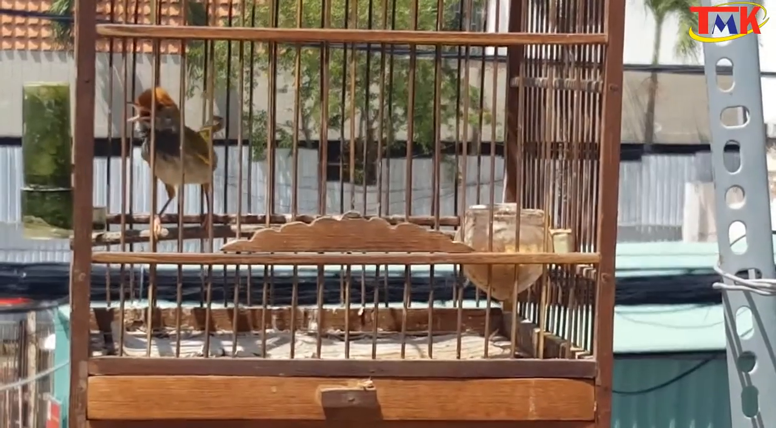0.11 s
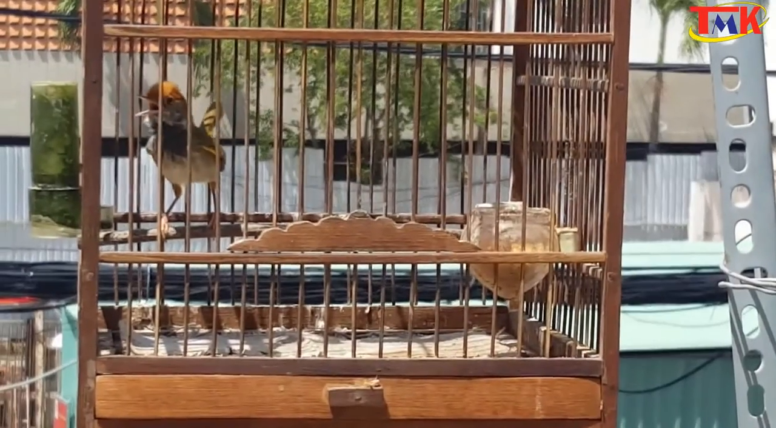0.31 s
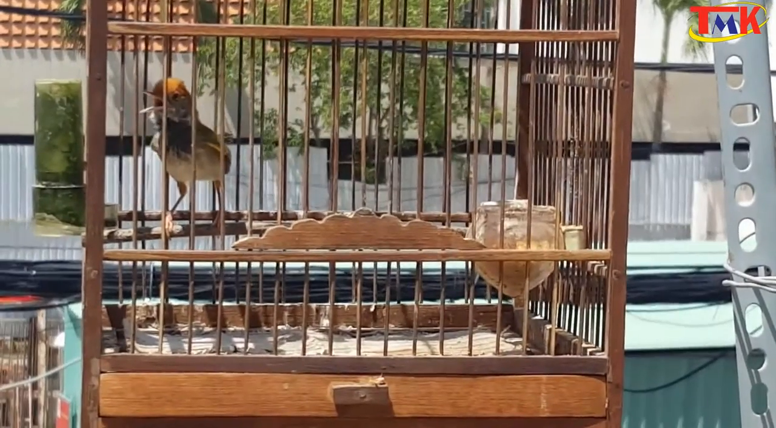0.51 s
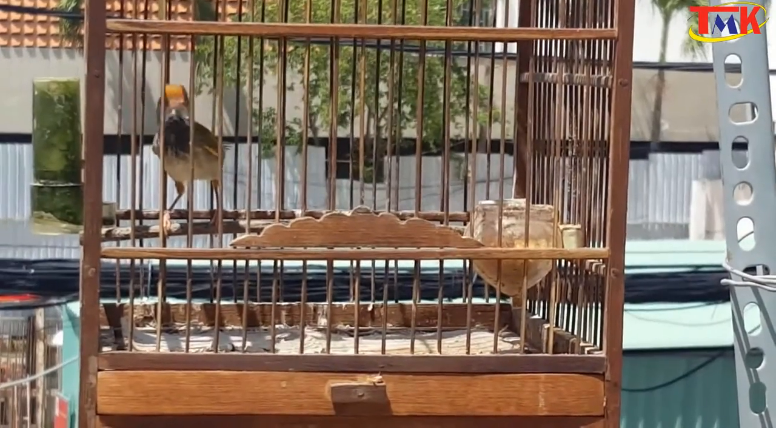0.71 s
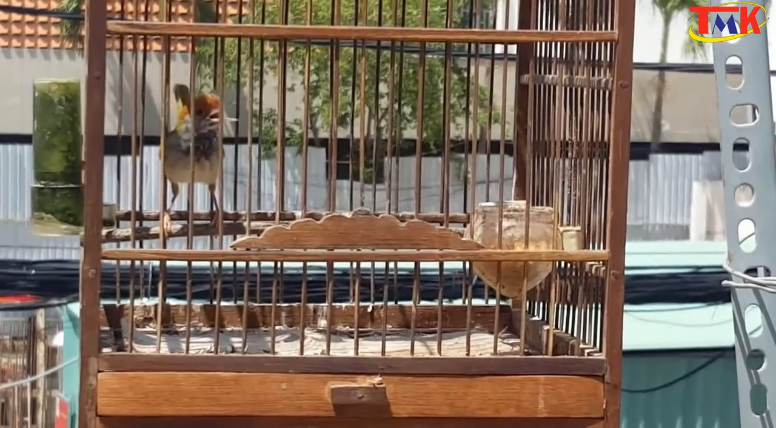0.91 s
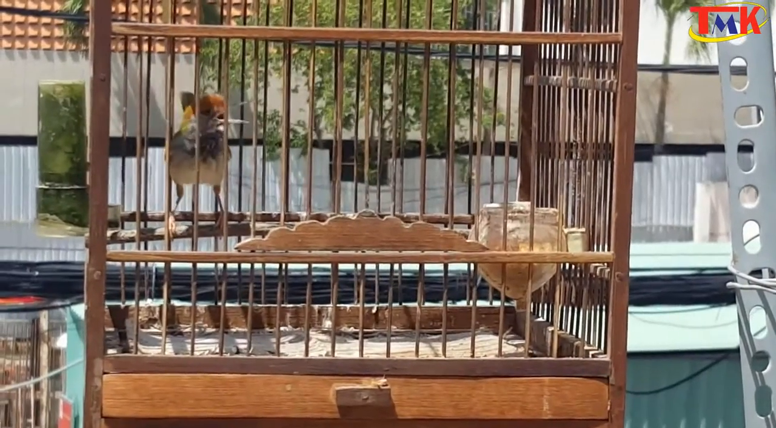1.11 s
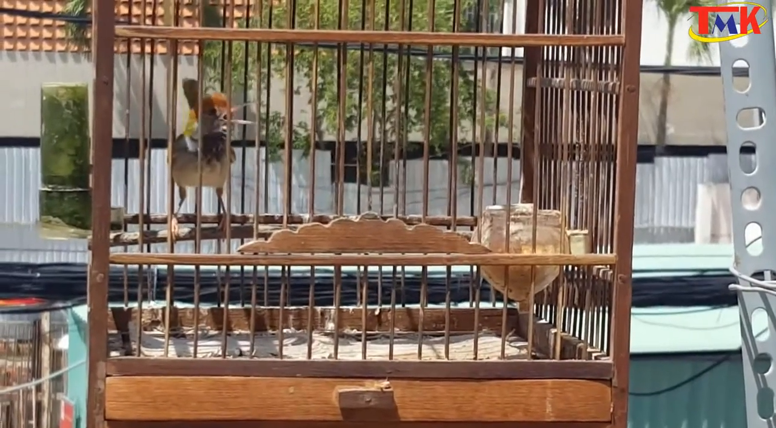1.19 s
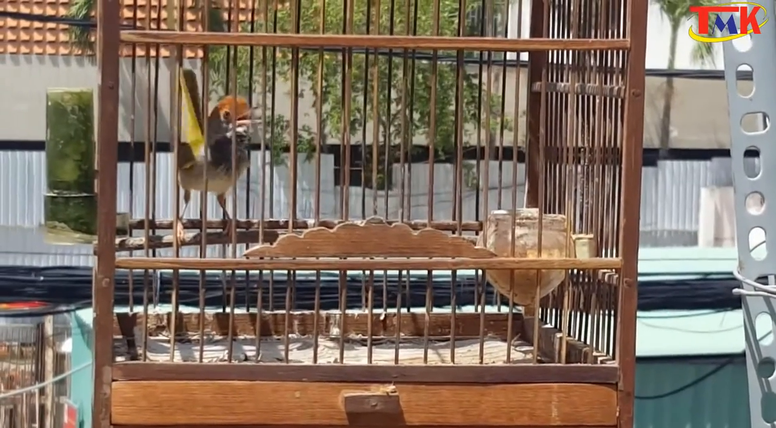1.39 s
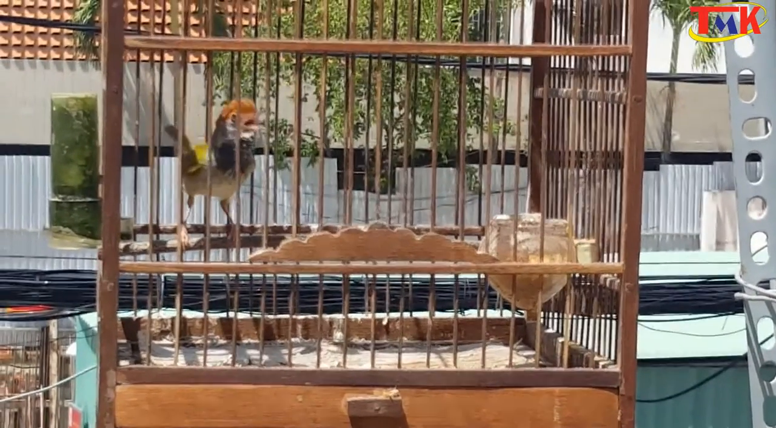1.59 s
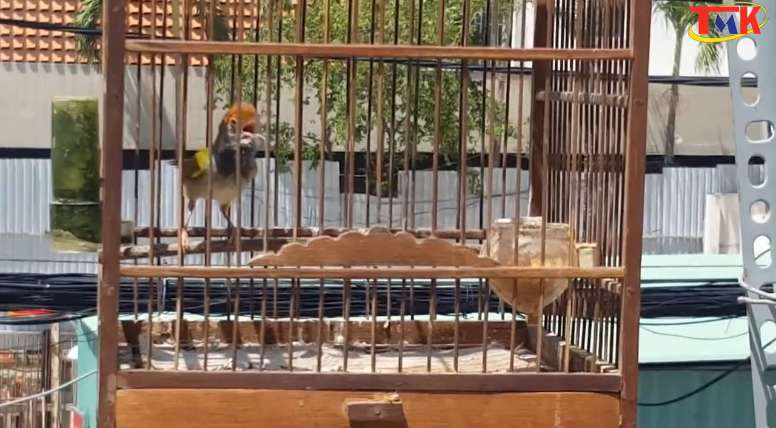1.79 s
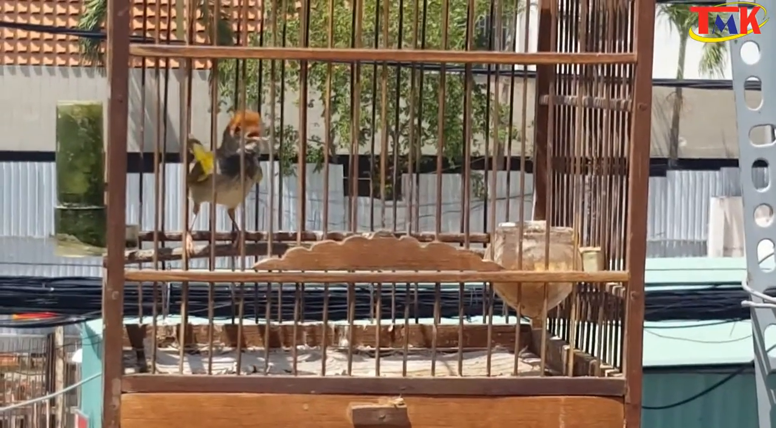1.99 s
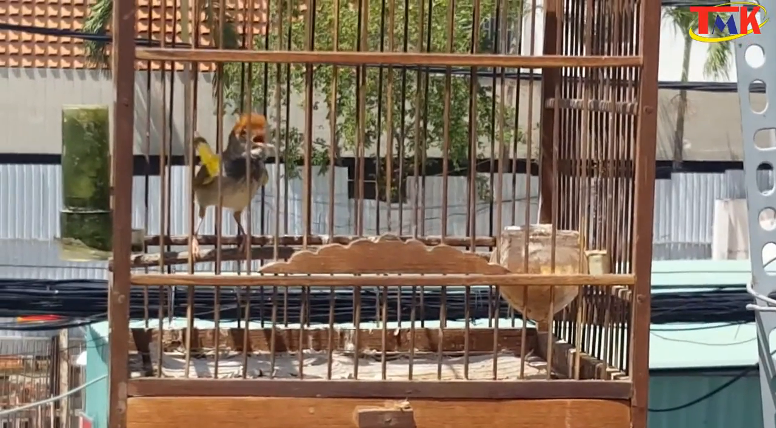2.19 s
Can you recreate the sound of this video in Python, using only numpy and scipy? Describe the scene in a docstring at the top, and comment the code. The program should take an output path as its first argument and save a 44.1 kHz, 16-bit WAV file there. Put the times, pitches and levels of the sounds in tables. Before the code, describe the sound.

A small caged bird close by gives two bright, swelling, rapid-fire trills, each starting with a sharp tick and ending on a short held note; other birds chirp around a walled yard over faint traffic.

```python
"""Outdoors in a walled yard in a city, a small caged bird sings two phrases.
Each is a sharp falling tick, a fast swelling trill of tone pulses, and a held note on an arched pitch.
Other birds are gliding tones: chirps, whistles and a slur, blurred by scattered reflections.
Behind them, coloured noise makes traffic, a passing vehicle, a faint steady hiss and a treble hiss
that rises and falls in level; a wavering low tone makes an engine's hum."""
import sys
import numpy as np
from scipy import signal
from scipy.fft import rfft, irfft
from scipy.io import wavfile

SR = 44100
rng = np.random.default_rng(int(sys.argv[2]) if len(sys.argv) > 2 else 0)


def output_pcm(signal):
    """Save a mono or channel-first signal as 16-bit PCM at the path in sys.argv[1].

    Samples are clipped to [-1, 1] before scaling.
    """
    pcm = np.clip(np.atleast_2d(signal).T, -1, 1) * 32767
    wavfile.write(sys.argv[1], SR, np.round(pcm).astype(np.int16))


N = 97020

# The held note closing each trill, and the carrier of that trill:
# start_s, length_s, pitch_hz, level_db, trill_carrier_hz
HELD_NOTES = [(.696, 0.044, 3609, -9.3, 3400), (1.9052, 0.0425, 3578, -8.7, 3383)]

YARD_T60_S, YARD_RISE_S = 0.21, 0.0021
FAR_RISE_S = 0.011  # slower build-up of the reflections of a far bird
DENSE_TAPS_PER_S, SPARSE_TAPS_PER_S = 3000, 750
SINGER_PAN_DB, SINGER_LAG_S = 5, 0.000325


def amp(db):
    """Level and amplitude: 20 dB is a factor of ten."""
    return 10 ** (np.asarray(db) / 20)


def evened(x):
    """Normalisation of power: scales to rms 1."""
    return x / np.sqrt(np.mean(x ** 2) + 1e-20)


def read(points, hz):
    """Interpolates a spectrum on a logarithmic frequency axis."""
    f, value = np.transpose(points)
    return np.interp(np.log(hz + 1), np.log(f + 1), value)


def curve(points):
    """Amplitude envelope: gain over time, interpolated in decibels between (s, dB) points."""
    return amp(np.interp(np.arange(N) / SR, *np.transpose(points)))


def add(mix, s, sound):
    """Superposition: adds a stereo sound at time s, cut to fit the mix."""
    at = round(s * SR)
    sound = sound[:, max(-at, 0):]
    part = mix[:, max(at, 0):][:, :sound.shape[1]]
    part += sound[:, :part.shape[1]]


def pan(db):
    """Interaural level difference: left and right gains, positive dB to the left."""
    return amp([[db / 2], [-db / 2]])


def drift(t, seconds):
    """Random modulation of about unit size: Gaussian knots at the given spacing, joined by lines."""
    knots = rng.standard_normal(size=256)
    return np.interp((t - t[0]) / seconds, np.arange(len(knots)), knots)


def fades(t, length, attack, release):
    """Amplitude envelope with quarter-sine attack and release."""
    rise = np.sin(np.pi / 2 * np.clip(t / attack, 0, 1))
    fall = np.sin(np.pi / 2 * np.clip((length - t) / release, 0, 1))
    return rise * fall


def sweep(t, hz):
    """Frequency modulation: phase is the integral of a slightly unsteady pitch curve."""
    waver, waver_s = 0.004, 0.003  # share of the pitch, spacing of its changes
    return 2 * np.pi * np.cumsum(hz * (1 + waver * drift(t, waver_s))) / SR


def bend(u, first, middle, last):
    """Continuous glide: a parabola of pitch through three equally spaced points."""
    return np.polyval(np.polyfit([0, .5, 1], [first, middle, last], 2), u)


def yard(x, t60=YARD_T60_S, rise_s=YARD_RISE_S, taps_per_s=SPARSE_TAPS_PER_S):
    """Reverberation: convolution with random reflections that build up and die away exponentially."""
    t = np.arange(SR // 2) / SR
    taps = rng.choice([-1., 1.], (2, len(t))) * (rng.random((2, len(t))) < taps_per_s / SR)
    taps *= (1 - np.exp(-t / rise_s)) * amp(-60 * t / t60)
    taps /= np.linalg.norm(taps, axis=1, keepdims=True)  # unit energy in each channel
    return signal.fftconvolve(x, taps, axes=1)


def noise(spectrum):
    """Spectral shaping of partly coherent noise: nearly mono in the bass, overall rms 1."""
    # Coherence of the two channels: frequency_hz, correlation (-1 to 1)
    coherence = [(30, 0.99), (160, 0.96), (350, 0.87), (700, 0.34), (1400, -.25), (3000, 0.09),
                 (10000, 0.02)]
    hz = np.fft.rfftfreq(N, 1 / SR)
    a, b = rfft(rng.standard_normal((2, N)))
    same = np.clip(read(coherence, hz), -1, 1)
    right = same * a + np.sqrt(1 - same ** 2) * b
    return evened(irfft(np.array([a, right]) * amp(read(spectrum, hz)), N))


def city():
    """Broadband noise for traffic and a faint hiss; a frequency-modulated tone for the engine."""
    # Colour of the traffic: frequency_hz, relative_density_db
    traffic_colour = [(15, -51.5), (25, -27), (67, -7.5), (133, 0.5), (150, -12), (173, -9), (216, -13),
                      (267, -10.5), (291, -14), (400, -19), (1600, -28), (2080, -44), (3520, -120)]
    # Course of the traffic: time_s, relative_level_db
    traffic_course = [(.45, 0.9), (.9, 0.03), (2.2, -1)]
    # Peak amplitude of a distant engine's hum before panning: time_s, level_db
    hum_course = [(0, -36.5), (.7, -35.5), (1.1, -32.5), (1.65, -43), (1.9, -62), (2.2, -35.5)]
    # Colour of the outdoor hiss: frequency_hz, relative_density_db
    hiss_colour = [(800, -21.5), (1600, -2), (2500, -1), (4000, -20), (6500, -12.5), (8500, -19),
                   (10000, -27), (13000, -30), (15000, -22), (16000, -24.5)]
    traffic_db, hiss_db, pan_db = -33, -46.5, 1.8
    hum_hz, hum_waver, hum_waver_s = 144.9, 0.0057, 0.0806
    t = np.arange(N) / SR
    turns = np.cumsum(hum_hz * (1 + hum_waver * drift(t, hum_waver_s))) / SR
    hum = curve(hum_course) * np.sin(2 * np.pi * turns)
    traffic = amp(traffic_db) * curve(traffic_course) * noise(traffic_colour)
    return pan(pan_db) * (traffic + hum) + amp(hiss_db) * noise(hiss_colour)


def vehicle():
    """Pass-by some streets away: engine and tyre noise under a Gaussian swell."""
    # Colour of the vehicle: frequency_hz, relative_density_db
    vehicle_colour = [(100, -39), (180, -3.5), (270, 1.5), (400, -23.5), (1000, -20), (2000, -55)]
    centre_s, width_s, level_db = 0.45, 0.16, -36.5
    t = np.arange(N) / SR
    swell = np.exp(-((t - centre_s) / width_s) ** 2)
    return amp(level_db) * swell * noise(vehicle_colour)


def treble_hiss():
    """Amplitude modulation of band noise: a treble hiss that rises and falls in level."""
    # Colour of the treble hiss: frequency_hz, relative_density_db
    treble_colour = [(2000, -29), (3200, 5), (4500, 2.5), (5500, -1), (7000, -6), (8500, -6.5),
                     (10000, -23), (16000, -23.5)]
    # Course of the treble hiss: time_s, level_db
    treble_course = [(0, -45), (.08, -54.5), (.19, -41.5), (.39, -42.5), (.54, -47.5), (.67, -40.5),
                     (.92, -52), (1.03, -52.5), (1.1, -39), (1.27, -47), (1.36, -39.5), (1.52, -43),
                     (1.68, -39), (1.76, -45.5), (1.88, -37), (1.96, -54), (2.04, -63), (2.125, -39.5),
                     (2.2, -96)]
    return curve(treble_course) * noise(treble_colour)


def whistlers():
    """Pure tones: long, nearly level whistles of distant birds, with weak reverberation."""
    # Whistles; the level is the one reached toward the end, after the swell (negative sinks):
    # start_s, length_s, start_hz, middle_hz, end_hz, level_db, swell_db, left_over_right_db
    whistles = [(0.487, 0.14, 2400, 2424, 2434, -33.5, 20, -9.5),
                (.675, 0.18, 2440, 2470, 2460, -40, 0, -6.5), (0.886, 0.15, 3075, 3090, 3110, -42.5, 6, 19),
                (1.028, 0.092, 3110, 3148, 3150, -18, 27.5, 7.5),
                (1.045, 0.17, 2113, 2128, 2104, -42.5, -10, -4),
                (1.174, 0.12, 2102, 2125, 2080, -41.5, -12.5, -4),
                (1.769, 0.13, 2380, 2410, 2446, -34, 18, 9),
                (1.91, 0.23, 2496, 2460, 2570, -37.5, -0.5, -4.5)]
    fade_s, wet_db = 0.03, -12
    out = np.zeros((2, N))
    for s, length, first, middle, last, db, swell_db, pan_db in whistles:
        t = np.arange(0, length, 1 / SR)
        hz = bend(t / length, first, middle, last) * (1 + 0.003 * drift(t, 0.026))
        gain = amp(db + swell_db * (t / length - 1.0)) * fades(t, length, fade_s, fade_s)
        note = pan(pan_db) * gain * np.sin(2 * np.pi * np.cumsum(hz) / SR)
        add(out, s, note)
        add(out, s, amp(wet_db) * yard(note))
    return out


def neighbours():
    """Direct-to-reverberant ratio: quick chirps, the further ones mostly reflections from the walls."""
    # Chirps of the other birds:
    # start_s, length_s, start_hz, middle_hz, end_hz, direct_db, reverberant_db, left_over_right_db
    chirps = [(-.005, 0.033, 5710, 7220, 7200, -36, -31, 2.5),
              (0.072, 0.032, 4920, 5700, 6230, -52, -38.5, -1),
              (0.116, 0.043, 5080, 6160, 6760, -51, -33, 4.5),
              (0.154, 0.033, 6470, 7360, 7960, -54, -31.5, 3),
              (0.225, 0.017, 4750, 5320, 5600, -29.5, -31, 4.5),
              (0.339, 0.028, 5120, 6500, 7300, -51.5, -29, 3.5),
              (0.427, 0.055, 1917, 2120, 2400, -48, -43.5, -3),
              (0.515, 0.057, 3500, 2737, 2030, -36, -29.5, 5),
              (0.594, 0.04, 4900, 6500, 7600, -64, -31.5, 3.5),
              (0.728, 0.059, 3610, 3007, 1940, -51, -27, 3), (0.743, 0.012, 2160, 2010, 1890, -42, -28, 0),
              (0.809, 0.05, 2400, 3003, 3480, -30.5, -24, 0),
              (0.955, 0.0059, 5970, 7130, 7970, -33, -19, 0),
              (0.966, 0.0413, 7350, 7260, 7160, -22.5, -27, -11.5),
              (0.99, 0.056, 7150, 6740, 5860, -18.5, -23, 1.5),
              (0.984, 0.027, 3115, 2380, 2070, -35.5, -31.5, 3),
              (1.091, 0.036, 3140, 3560, 4320, -46, -22.5, 2),
              (1.154, 0.069, 6180, 6270, 6410, -43.5, -39, -10),
              (1.179, 0.022, 5300, 6240, 7420, -47, -27.5, 4),
              (1.468, 0.031, 3375, 2700, 1870, -34, -31, -1),
              (1.577, 0.017, 4950, 6450, 7450, -63, -31.5, 1),
              (1.652, 0.051, 3230, 2424, 1680, -34.5, -32.5, 2),
              (1.643, 0.033, 7270, 6700, 6000, -54, -50, 4.5),
              (1.687, 0.025, 4920, 5900, 6840, -60, -37.5, 1.5),
              (1.947, 0.013, 7800, 8260, 8600, -42.5, -45.5, 0),
              (2.066, 0.047, 3380, 4060, 4900, -65, -32.5, -0.5),
              (2.083, 0.05, 2410, 3115, 3430, -33.5, -26.5, 0.5)]
    attack, release = 0.13, 0.42  # shares of the length
    octave_db, direct_octave_share = -27, 0.24
    waver, waver_s = 0.005, 0.0012
    far_below_db = -5  # direct over reverberant level; below this a bird counts as far
    out = np.zeros((2, N))
    for s, length, first, middle, last, db, wet_db, pan_db in chirps:
        t = np.arange(0, length, 1 / SR)
        hz = bend(t / length, first, middle, last) * (1 + waver * drift(t, waver_s))
        phase = sweep(t, hz)
        gain = pan(pan_db) * fades(t / length, 1.0, attack, release)
        octave = amp(octave_db) * np.sin(2 * phase)
        add(out, s, amp(db) * gain * (np.sin(phase) + direct_octave_share * octave))
        # reflections of a far bird are denser and build up slowly
        rise_s, taps_per_s = YARD_RISE_S, SPARSE_TAPS_PER_S
        if db - wet_db < far_below_db:
            rise_s, taps_per_s = FAR_RISE_S, DENSE_TAPS_PER_S
        reflected = yard(gain * (np.sin(phase) + octave), rise_s=rise_s, taps_per_s=taps_per_s)
        add(out, s, amp(wet_db) * reflected)
    return out


def slur():
    """Frequency modulation: a nearer bird's loud note dips and climbs, with strong reflections."""
    # Course of the note: time_s, pitch_hz, level_db
    note_course = [(1.306, 3580, -25.5), (1.320, 3480, -17), (1.329, 3127, -17), (1.333, 2456, -29),
                   (1.34, 2046, -37.5), (1.347, 2842, -22), (1.357, 3157, -26), (1.361, 3343, -12),
                   (1.369, 3590, -21.5), (1.379, 3830, -20.5), (1.392, 4280, -45)]
    wet_db, pan_db = -1.5, 1
    s, pitch, db = np.transpose(note_course)
    t = np.arange(s[0], s[-1], 1 / SR)
    gain = amp(np.interp(t, s, db)) * fades(t - s[0], s[-1] - s[0], .002, 0.0034)
    note = pan(pan_db) * gain * np.sin(sweep(t, np.interp(t, s, pitch)))
    out = np.zeros((2, N))
    add(out, s[0], note)
    add(out, s[0], amp(wet_db) * yard(note, rise_s=FAR_RISE_S))
    return out


def voice(phase, hz, gain, pan_db, lag_s):
    """Weak harmonics on a nearly pure tone, with an arrival lag at the right microphone."""
    # Overtones of the singer: multiple, level_db relative to the fundamental
    overtones = [(2, -40), (4, -46.5)]
    phase = np.array([phase, phase - 2 * np.pi * hz * lag_s])
    tone = np.sin(phase)
    for multiple, db in overtones:
        tone += amp(db) * np.sin(round(multiple) * phase)
    return pan(pan_db) * gain * tone


def add_ticks(out):
    """Transient: a steep falling chirp scattered in the cage, with a decaying noisy crack."""
    # The tick that opens each phrase: time_s, level_db, left_over_right_db
    openings = [(0.2013, -11.5, 2), (1.4242, -12, 3.5)]
    # Colour of the tick's noisy edge: frequency_hz, relative_density_db
    crack_colour = [(1300, -35), (2100, -7), (4200, 0), (5500, -8), (8000, -28)]
    tick_s, centre_hz, fall_hz_per_s, lag_s = 0.0028, 4315, 380000, 0.00027
    scatter_db, cage_t60_s = -6, 0.045
    crack_db, crack_s = -17, 0.004  # level relative to the tick, decay time constant
    for s, db, pan_db in openings:
        t = np.arange(-2 * tick_s, 4 * tick_s, 1 / SR)
        hz = centre_hz - fall_hz_per_s * t
        tick = voice(sweep(t, hz), hz, amp(db) / np.cosh(2 * t / tick_s), pan_db, lag_s)
        add(out, s + t[0], tick)
        scatter = yard(tick, cage_t60_s, taps_per_s=DENSE_TAPS_PER_S)
        add(out, s + t[0], amp(scatter_db) * scatter)
        decay = np.exp(-np.arange(N) / SR / crack_s)
        add(out, s, amp(db + crack_db) * decay * noise(crack_colour))


def add_trills(out):
    """Amplitude modulation: one carrier chopped into pulses that lengthen, flatten and swell."""
    # Centres of the pulses: time_s
    pulse_centres = [.2605, .2829, .3068, .331, .3547, .3776, .4003, .4228, .445, .4678, .49, .5121, .5351,
                     .5572, .5798, .6017, .6235, .646, .6678, .690, 1.4832, 1.5066, 1.5305, 1.5545, 1.578,
                     1.6019, 1.6245, 1.647, 1.6693, 1.6916, 1.714, 1.7366, 1.7591, 1.7807, 1.8025, 1.825,
                     1.8473, 1.8695, 1.8905]
    # Pulse shape as the held note nears: time_before_it_s, length_s, pitch_hz, glide_hz_per_s
    pulse_shape = [(.014, .0165, 3480, -4000), (.04, .0145, 3440, -1000), (.15, .013, 3415, 5000),
                   (.26, .012, 3410, 13000), (.32, .0105, 3455, 30000), (.38, .01, 3455, 52000),
                   (.44, .009, 3370, 105000)]
    # Swell toward the held note: time_before_it_s, level_db
    crescendo = [(.014, -13), (.1, -14.5), (.2, -16.5), (.3, -18.5), (.37, -19.5), (.44, -24)]
    scatter_db, scatter_hz = 0.6, 12  # random spread from pulse to pulse
    roundness, flick_hz = 0.9, 170
    nearing, *columns = np.transpose(pulse_shape)
    for s in pulse_centres:
        before, carrier_hz = min((row[0] - s, row[-1]) for row in HELD_NOTES if row[0] > s)
        louder, higher = rng.standard_normal(size=2)
        db = np.interp(before, *np.transpose(crescendo)) + scatter_db * louder
        length, pitch, glide = (np.interp(before, nearing, column) for column in columns)
        t = np.arange(0, length, 1 / SR)
        # early pulses glide upward; a small flick raises each start and lowers each end
        flick = flick_hz * np.sign(length / 2 - t) * abs(1 - 2 * t / length) ** 4
        hz = pitch + scatter_hz * higher + glide * (t - length / 2) + flick
        arch = np.sin(np.pi * t / length) ** roundness
        phase = sweep(t, hz)
        # the middle of each pulse is in phase with one continuous carrier
        phase += 2 * np.pi * carrier_hz * s - phase[len(t) // 2]
        add(out, s - length / 2, voice(phase, hz, amp(db) * arch, SINGER_PAN_DB, SINGER_LAG_S))


def add_held_notes(out):
    """Sustained tone: pitch rises and falls in a parabolic arch under a quick attack."""
    arch_hz, attack_s, release_s = 85, 0.005, 0.012
    for s, length, pitch, db, _ in HELD_NOTES:
        t = np.arange(0, length, 1 / SR)
        hz = pitch - arch_hz * (2 * t / length - 1) ** 2
        gain = amp(db) * fades(t, length, attack_s, release_s)
        add(out, s, voice(sweep(t, hz), hz, gain, SINGER_PAN_DB, SINGER_LAG_S))


def singer():
    """Direct sound, discrete echoes and reverberation of the song; pulses merge in the held note."""
    # Nearby surfaces and walls that throw the singer back: delay_s, level_db relative to the song
    echoes = [(.0024, -19), (.0057, -14.5), (.0118, -20), (.031, -27), (.052, -24)]
    wet_db = -15.5
    song = np.zeros((2, N))
    add_ticks(song)
    add_trills(song)
    add_held_notes(song)
    heard = song + amp(wet_db) * yard(song[:1], taps_per_s=DENSE_TAPS_PER_S)[:, :N]
    for delay, db in echoes:
        add(heard, delay, amp(db) * song[::-1])  # channels swapped
    return heard


def scene():
    """Superposition of the singer, the other birds and the city."""
    background = city() + vehicle() + treble_hiss()
    other_birds = whistlers() + neighbours() + slur()
    return background + other_birds + singer()


def record(dry):
    """Band limitation: a linear-phase low-pass filter as the recorder's upper edge."""
    edge_hz = 15900
    low_pass = signal.firwin(511, edge_hz, window=("kaiser", 9), fs=SR)
    return signal.oaconvolve(dry, low_pass[None], "same")


dry = scene()
out = record(dry)
output_pcm(out)
```